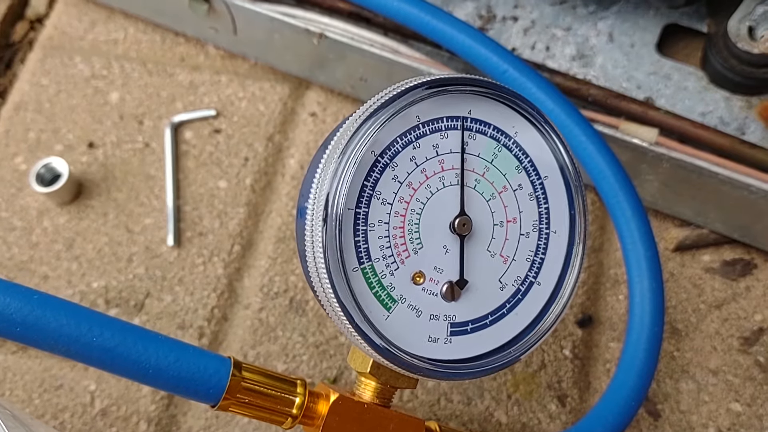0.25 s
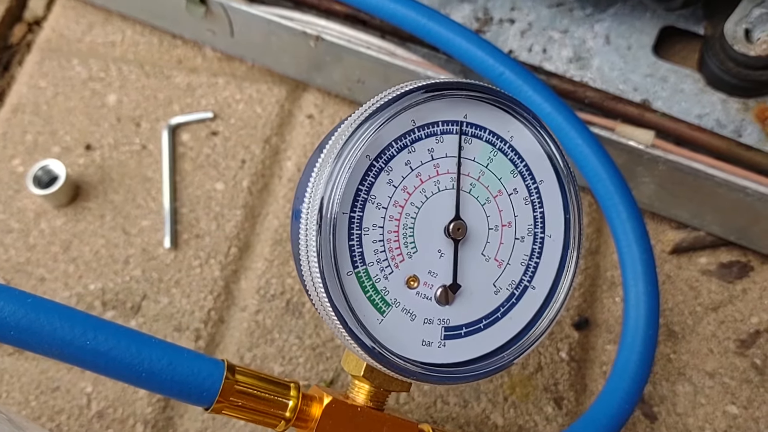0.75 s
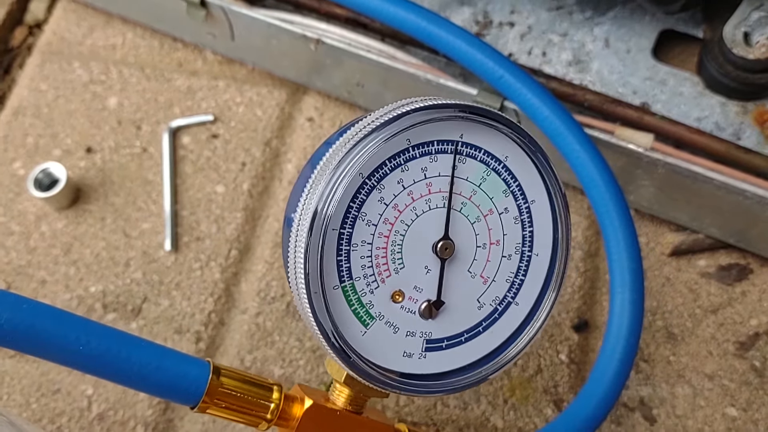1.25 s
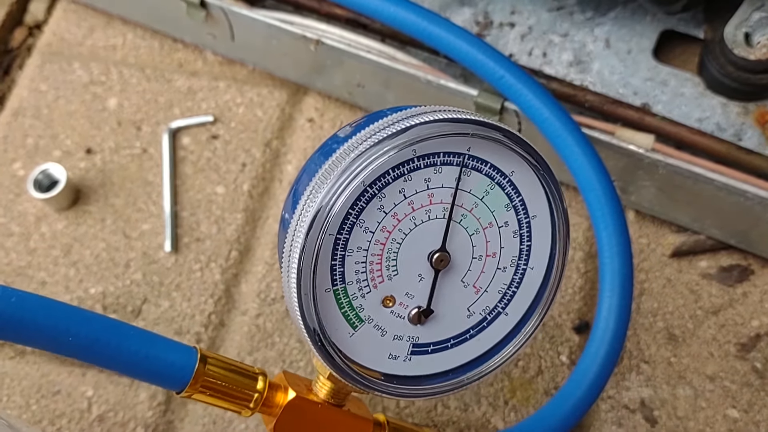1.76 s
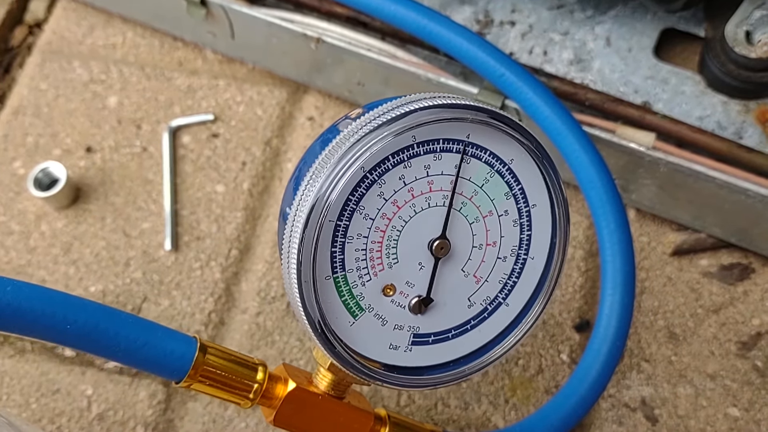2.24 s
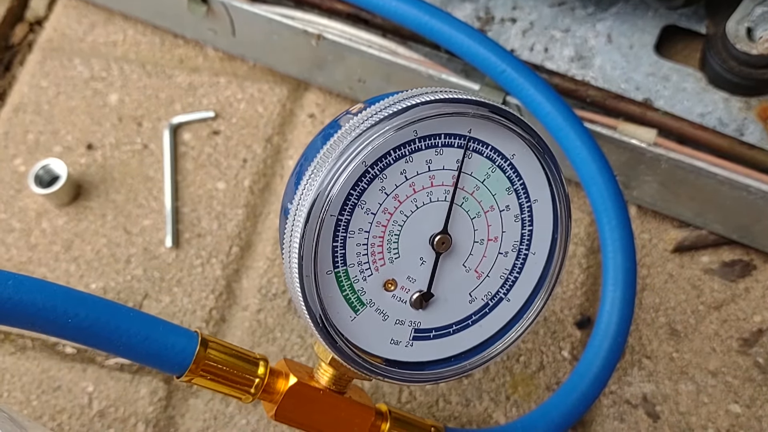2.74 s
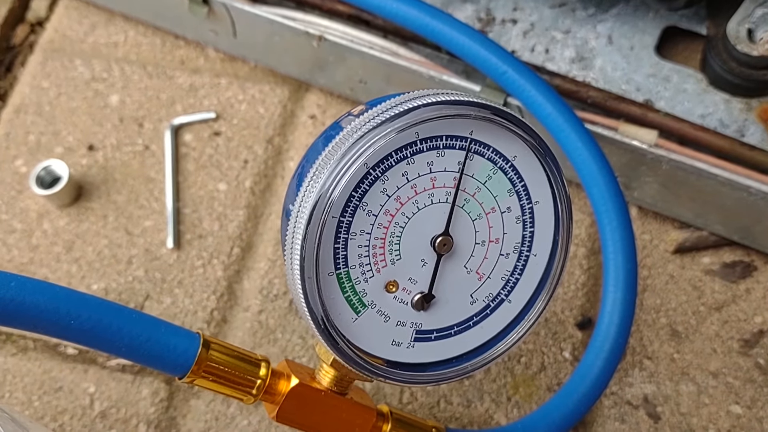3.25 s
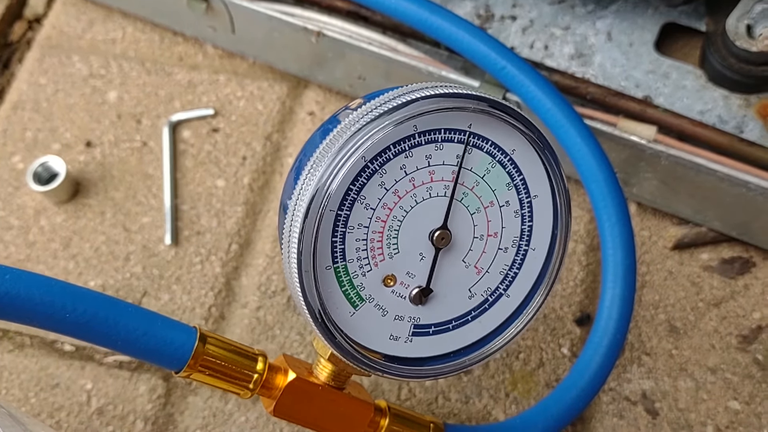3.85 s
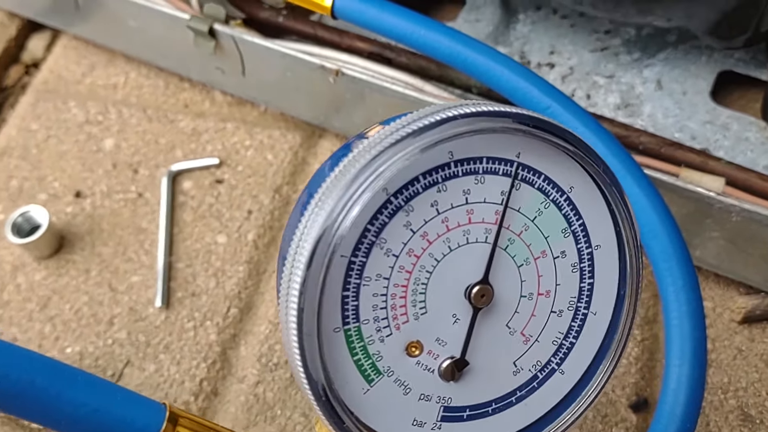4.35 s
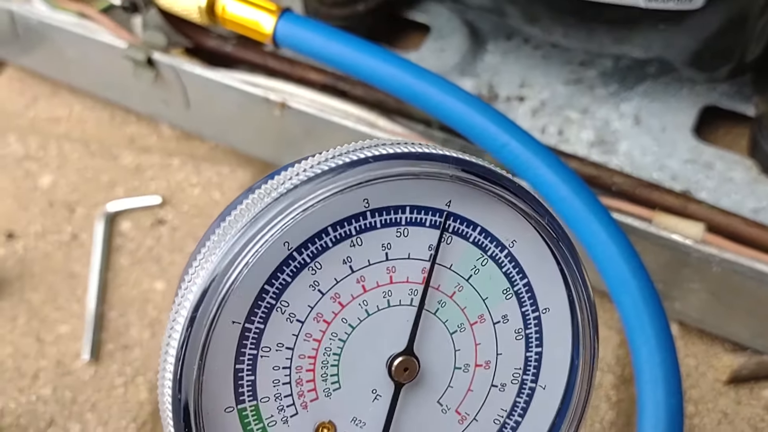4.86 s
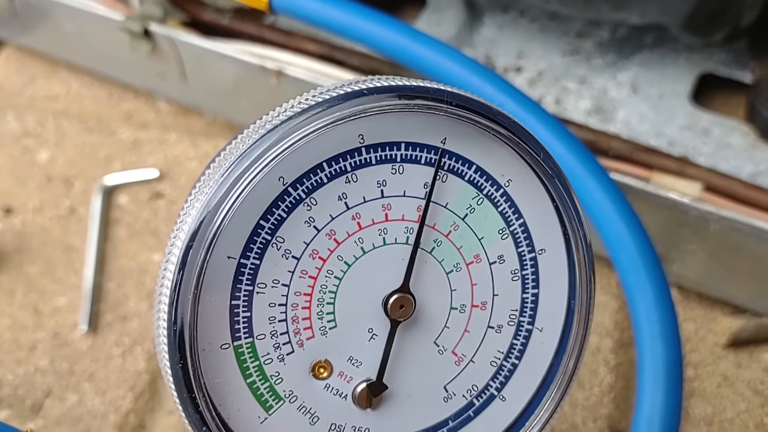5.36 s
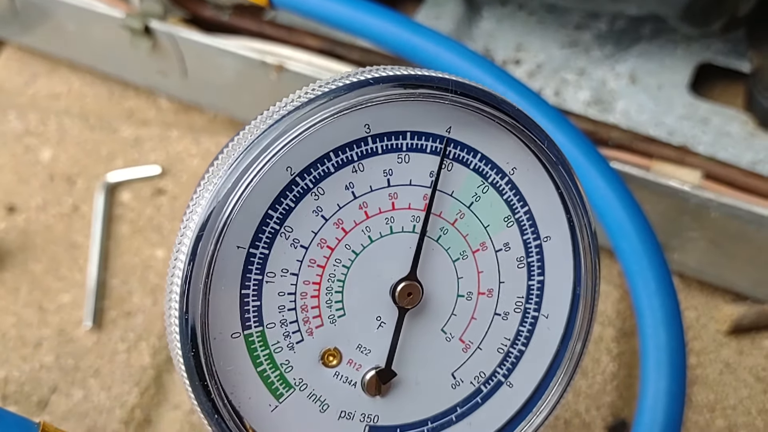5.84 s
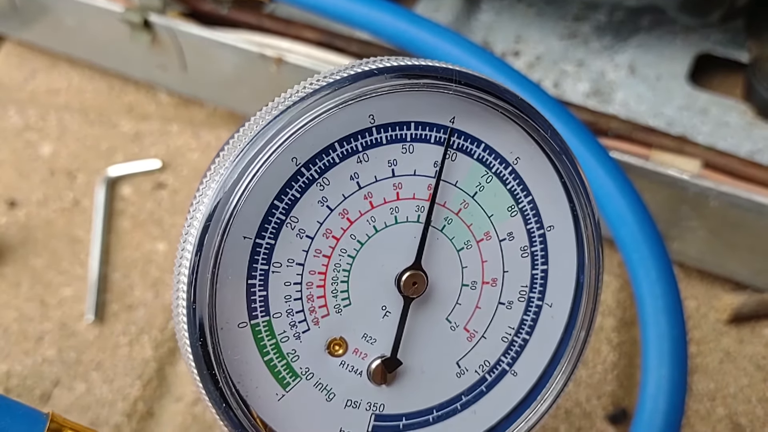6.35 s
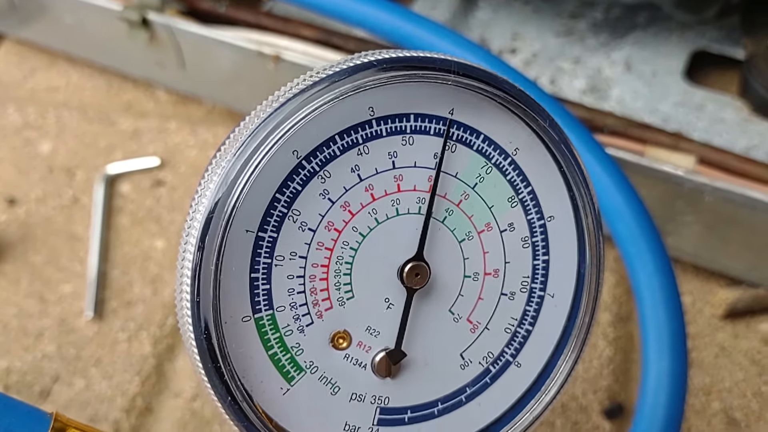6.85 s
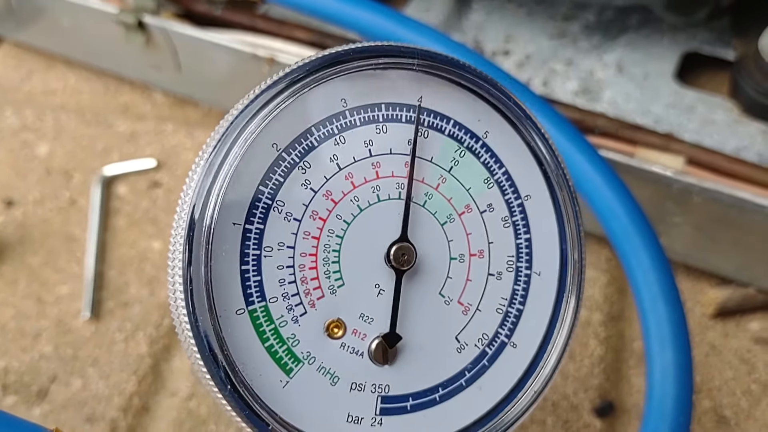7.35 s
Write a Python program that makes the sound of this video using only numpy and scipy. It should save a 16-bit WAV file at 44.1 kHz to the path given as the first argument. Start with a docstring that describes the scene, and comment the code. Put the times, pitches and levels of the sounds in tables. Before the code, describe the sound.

Outdoors, a compressor and fan drone steadily beneath a bright, sizzling refrigerant hiss. At first the hiss is fuller, with faint breathy whistles that fade as the valve settles just after one second. Sparse metallic ticks follow, clustering near four to five seconds as the handheld stereo microphone moves closer and the hiss changes colour. A sharp click and knock come near the end.

```python
"""Outdoors, a refrigerator compressor and a fan hum while refrigerant hisses through a valve and copper tubing.
The machine is sums of sine tones, and the air rumble and shaking panels are coloured noise.
The hiss is noise shaped into a broad jet and many narrow tubing resonances, with two whistles at the start.
The hand-held stereo microphone moves nearer to the gauge half way through, which recolours the hiss.
Fittings tick now and then, with short falling snaps and dull knocks of the gauge body."""
import sys
import numpy as np
from scipy import signal
from scipy.fft import rfft, irfft, next_fast_len
from scipy.io import wavfile
from scipy.ndimage import uniform_filter1d

SR = 44100
rng = np.random.default_rng(int(sys.argv[2]) if len(sys.argv) > 2 else 0)


def boost_factor(decibels):
    """Convert a level in decibels to a linear amplitude factor."""
    exponent = np.asarray(decibels, float) / 20
    return 10 ** exponent


def to_wav(s):
    """Save 16-bit WAV."""
    ch = np.atleast_2d(s).T  # columns
    pcm = np.round(np.clip(ch, -1, 1) * 32767)  # PCM
    wavfile.write(sys.argv[1], SR, pcm.astype(np.int16))


N = 335160  # samples, 7.6 s
T = np.arange(N) / SR
SIZE = next_fast_len(N)
HZ = np.arange(SIZE // 2 + 1) * SR / SIZE  # frequency of every noise bin
SETTLE_S = 1.08  # the valve settles here


def sides(pan_db):
    """Left and right gains that differ by pan_db."""
    return boost_factor(np.array([pan_db, -pan_db]) / 2)


def over_time(table):
    """Reads a (time, value) table at every sample, with straight lines between its points."""
    return np.interp(T, *np.transpose(table))


def on_log(table):
    """Reads a (frequency, value) table at every bin, straight on a logarithmic frequency scale."""
    hz, value = np.transpose(table)
    return np.interp(np.log(HZ + 1), np.log(hz), value)


def bumps(table):
    """Adds up smooth humps, each with its own rise and fall."""
    return sum(db * np.exp(-((T - s) / np.where(T < s, rise, fall)) ** 2) for s, db, rise, fall in table)


def noise(gain, alike, lead=0.):
    """Stereo noise of rms 1 coloured by gain; alike (0-1) is the share of power common to both sides."""
    common, left, right = rng.standard_normal((3, len(HZ))) + 1j * rng.standard_normal((3, len(HZ)))
    alike = np.clip(alike, 0, 1)
    left_lead = np.exp(1j * lead * np.array([[1], [0]]))
    pair = np.sqrt(alike) * common * left_lead + np.sqrt(1 - alike) * np.array([left, right])
    x = irfft(pair * gain, SIZE)[:, :N]
    return x / np.sqrt(np.mean(x ** 2))


def resonance(hz, width):
    """Gain of a resonance passed twice; width is taken 3 dB down."""
    return 1 / (1 + (np.sqrt(2) - 1) * (2 * (HZ - hz) / width) ** 2)


def walk(rate):
    """A random wandering curve: new levels rate times a second, smoothed twice; spread near 1."""
    k = int(SR / rate)
    held = np.repeat(rng.standard_normal(N // k + 1), k)
    return 0.72 * uniform_filter1d(uniform_filter1d(held, k), k)[:N]


def tones(phase, table, waver_db):
    """Sine tones at multiples of a turning phase, each wavering in level on its own."""
    out = np.zeros((2, N))
    for k, left_db, right_db, lead in table:
        turn = k * phase + rng.uniform(0, 2 * np.pi)
        swell = np.sqrt(2) * boost_factor(waver_db * walk(2.505))
        out += swell * np.array([boost_factor(left_db) * np.sin(turn + lead), boost_factor(right_db) * np.sin(turn)])
    return out


def add(out, s, sound, db, pan_db):
    """Scales a short sound to its peak level and places it; the further side hears it a little later."""
    for channel, gain in enumerate(boost_factor(db) * sides(pan_db)):
        late = int(max(0, 1.5 * pan_db * (2 * channel - 1)))  # samples
        start = int(s * SR) + late
        piece = sound[:N - start]
        out[channel, start:start + len(piece)] += gain * piece / np.max(np.abs(sound))


# the microphone's path: [t/s, place (0 far, 1 passing, 2 near)]
PATH = [(0, 0), (3.2, .05), (4.2, .4), (4.6, 1.0), (5.2, 1.1), (6.0, 2), (7.6, 2)]


def microphone_place():
    """Where the microphone is at every moment, from far (0) to near (2)."""
    return over_time(PATH)


# moments when the panels and the rumble swell: [t/s, level/dB, rise/s, fall/s]
SWELLS = [(1.9, 4, 0.38, 0.055), (4.0, 5.5, 0.28, 0.082), (4.7, 10, 0.1, 0.15), (5.78, 5.5, 0.82, 0.59),
          (1.25, 2, 0.17, 0.13)]


def swells():
    """Level in dB of the low booming, with its passing swells."""
    return -1 + bumps(SWELLS)


# air and yard rumble: [f/Hz, relative level per Hz/dB]
AIR = [(18, -40), (30, -18), (92, 1), (270, -11.5), (382, -14), (472, -14), (583, -18.5), (944, -22),
       (1140, -26.5), (1290, -27.5), (1890, -36), (2340, -63), (3000, -31.5), (3900, -25), (6600, -120)]
# how alike left and right are, for the rumble and the panels: [f/Hz, likeness 0-1]
AIR_ALIKE = [(60, .99), (140, .93), (290, .85), (640, .4), (1400, .3)]
# balance of the rumble: [f/Hz, left minus right level/dB]
AIR_BALANCE = [(100, -1), (200, -3), (420, -2), (700, -1.5), (1500, -14.5), (2500, 4.5)]


def air_rumble(boom_db):
    """Moving air as broad noise, strongest in the bass, whose level wanders slowly and quickly."""
    air = noise(boost_factor(on_log(AIR)) * sides(on_log(AIR_BALANCE)), on_log(AIR_ALIKE))
    return boost_factor(-60 + 0.082 * boom_db + 1.4 * walk(3.18) + 2.2 * walk(12.0)) * air


# panels shaken by the air stream: [f/Hz, width/Hz, level/dB, left minus right level/dB]
PANELS = [(86, 9.4, -62.5, -1), (82.6, 8.6, -71.5, 0.5), (103.6, 25, -64.5, -3.5),
          (133.4, 13.5, -73.5, 1.5), (168, 42, -75.5, 13), (266, 22.3, -66, -1), (334.6, 24, -73, -5),
          (460, 32, -75.5, -8)]


def panels(boom_db):
    """Panels drum in the air stream: each is noise passed through one low resonance."""
    out = np.zeros((2, N))
    for hz, width, db, pan_db in PANELS:
        drumming = noise(resonance(hz, width), on_log(AIR_ALIKE))
        out += boost_factor(db + boom_db) * sides(pan_db)[:, None] * drumming
    return out


# other tones of fixed pitch: [f/Hz, left level/dB, right level/dB, left leads/rad]
TONES = [(45.5, -76, -76, 0), (137, -72, -73, 0), (149.5, -74, -78, 0), (199.45, -78, -68.5, -.4),
         (398.9, -82, -79, .7), (480.0, -86, -75, -3.0), (594.8, -89, -89, 1.2)]


def fixed_tones():
    """Low hums at fixed pitches that waver in level."""
    return tones(2 * np.pi * T, TONES, waver_db=7.5)


# five-blade fan: [multiple of fan rate, left level/dB, right level/dB, left leads/rad]
FAN = [(3, -79, -79, 0), (5, -61.5, -60.5, -.1), (7, -63, -63, 0), (9, -69, -69, -.3), (11, -81, -81, -.3),
       (13, -75, -76, .3), (15, -73.5, -74.5, -.5)]


def fan():
    """A fan hums at multiples of its turning rate, 14.21 Hz."""
    return tones(2 * np.pi * 14.21 * T, FAN, waver_db=4.0)


# compressor shaft, slowing as the pressure builds: [t/s, f/Hz]
SHAFT = [(0, 59.503), (3.8, 59.478), (7.6, 59.46)]


def shaft_phase():
    """Angle of the compressor shaft, summed up from its turning rate."""
    return 2 * np.pi * np.cumsum(over_time(SHAFT)) / SR


CYCLE = 8192  # points in one shaft turn


def turning(phase, table, starts):
    """One shaft turn built from its multiples, read round and round."""
    lines = np.zeros((2, CYCLE // 2 + 1), complex)
    for k, left_db, right_db, lead in table:
        lines[:, k] = np.exp(1j * starts[k]) * np.array([boost_factor(left_db) * np.exp(1j * lead), boost_factor(right_db)])
    turn = irfft(lines, CYCLE) * CYCLE / np.sqrt(2)
    angles = np.arange(CYCLE) * 2 * np.pi / CYCLE
    return np.array([np.interp(phase, angles, side, period=2 * np.pi) for side in turn])


# shell tones, all with columns [multiple of shaft rate, left level/dB, right level/dB, left leads/rad]
# those whose level and balance do not follow the microphone
SHELL_THROUGHOUT = [(1, -65, -66, -.1), (2, -75, -75, -.1), (3, -82, -82, -.6), (4, -76, -86, -.5),
                    (5, -77, -75, -.7), (6, -79, -75, -.4), (15, -94, -90, -2.3), (22, -90, -92, -1.7),
                    (29, -97, -88, -2.8), (30, -93, -93, 0)]
# as they reach the far place
SHELL_FAR = [(7, -80, -80, -0.5), (8, -77, -60, -3.0), (9, -78, -81, 0.1), (10, -89, -89, 1.3),
             (11, -81, -93, 1.1), (12, -95, -90, -1.2), (14, -85, -84, 1.3), (16, -92, -91, 2.6),
             (17, -89, -82, -2.0), (18, -96, -83, 0.3), (19, -76, -71, -0.4), (20, -81, -74.5, 1.8),
             (21, -89, -88, 0.3), (23, -93, -88, 1.5), (24, -76, -72, -3.0), (25, -73, -83, 3.0),
             (32, -92, -92, -0.3), (33, -87, -87, 0.3), (40, -99, -90, 2.0), (53, -88, -87, 0.9),
             (54, -104, -95, -1.5), (55, -98, -94, -1.5), (57, -93, -96, -2.9), (61, -99, -85, 2.6),
             (62, -95, -88, 3.1), (63, -89, -87, 0.0), (64, -88, -83, 1.8), (72, -98, -107, -3.0),
             (83, -88, -86, -0.5), (84, -84, -90, -0.2), (100, -81, -92, 0.3), (101, -84, -84, -2.1),
             (103, -91, -87, 1.1), (107, -99, -87, -2.8)]
# as they reach the near place
SHELL_NEAR = [(7, -82, -82, -0.6), (8, -72, -58, -3.1), (9, -74, -75, -0.0), (10, -86, -88, 1.1),
              (11, -82, -89, 1.4), (12, -88, -96, -0.7), (13, -90, -91, 0.0), (14, -81, -86, 0.8),
              (17, -89, -78, -2.4), (18, -94, -82, -0.0), (19, -76, -71, -0.6), (20, -79, -75, 2.3),
              (21, -88, -78, -1.1), (23, -88, -86, -2.4), (24, -76, -74, -2.9), (25, -74, -74, -3.1),
              (31, -86, -89, 0.5), (32, -89, -90, 0.2), (33, -97, -93, -0.2), (44, -104, -94, 0.4),
              (51, -82, -97, 2.2), (55, -93, -94, 2.8), (56, -90, -88, 2.7), (57, -86, -79, -2.6),
              (58, -82, -82, -2.2), (59, -82, -85, -2.6), (61, -82, -81, -1.5), (62, -81, -80, -1.1),
              (63, -87, -83, 2.8), (64, -94, -92, -0.6), (70, -97, -108, -2.9), (72, -96, -99, -0.0),
              (73, -81, -81, -0.0), (74, -82, -82, -0.1), (77, -103, -95, -1.8), (83, -82, -85, -0.0),
              (85, -88, -89, -3.0), (100, -86, -86, -0.1), (101, -88, -85, -2.2), (104, -95, -95, -3.1),
              (114, -79, -82, -1.2), (129, -94, -82, 2.0)]


def compressor_shell(phase, place):
    """The shell hums at multiples of the shaft rate; many are balanced anew as the microphone moves."""
    starts = rng.uniform(0, 2 * np.pi, CYCLE // 2)  # shared, so both places stay in step
    near = np.clip(place - .3, 0, 1)
    shell = turning(phase, SHELL_THROUGHOUT, starts)
    shell += (1 - near) * turning(phase, SHELL_FAR, starts)
    shell += near * turning(phase, SHELL_NEAR, starts)
    return boost_factor(.4 + .8 * walk(2.4)) * shell


# two high shell tones that make a thin whine:
# [multiple of shaft rate, left level/dB, right level/dB, left leads/rad]
WHINE_ORDERS = [(92, -70.5, -75, -1.0), (93, -80, -84, .7)]


def compressor_whine(phase, place):
    """A thin whine grows with the pressure at first, and is shaded once the gauge comes between."""
    shade_s, shade_time_s = 4.48, .06
    shade_db = -11 * np.clip((T - shade_s) / shade_time_s, 0, 1)
    shade_db += -1.5 * np.maximum(T - shade_s, 0)  # dB per s
    growth_db = -14 * np.maximum(2.1 - T, 0)  # 14 dB per s until 2.1 s
    whine = boost_factor(3.5 + shade_db + growth_db) * tones(phase, WHINE_ORDERS, waver_db=1.1)
    left_db = 7 * np.clip(place, 0, .5)  # the left side gains as the microphone sets off
    return whine * boost_factor(left_db * np.array([[1], [0]]))


# blows answered by the gauge body: [t/s, peak level/dB, centre f/Hz, left minus right level/dB]
KNOCKS = [(1.262, -53.5, 800, 8), (2.108, -48.5, 520, -2), (4.5965, -46, 1000, 7), (7.498, -41.5, 975, 3),
          (7.543, -48, 980, 4)]
# what the gauge body rings with: [f/Hz, level/dB, time to fall 60 dB/s]
BODY = [(430, 0, .035), (660, -5, .03), (945, 0, .045), (1150, -3, .025)]


def knocks():
    """The gauge body answers heavier ticks with low, dying modes that bloom just after the blow."""
    bloom_s = .0025
    out, t = np.zeros((2, N)), T[:SR // 12]
    hz, db, t60 = (c[:, None] for c in np.transpose(BODY))
    for s, peak_db, centre_hz, pan_db in KNOCKS:
        reach_db = -12 * np.log2(hz / centre_hz) ** 2
        wave = np.sin(2 * np.pi * hz * t + rng.uniform(0, 1, hz.shape))
        ring = boost_factor(db + reach_db - 60 * t / t60) * wave
        add(out, s, ring.sum(axis=0) * (1 - np.exp(-(t / bloom_s) ** 2)), peak_db, pan_db)
    return out


# snaps that sweep down the hose: [t/s, peak level/dB, length/s, left minus right level/dB]
SNAPS = [(.2209, -43, .002, -8), (3.9401, -37, .0025, -16), (3.9808, -44, .002, -14),
         (3.9891, -35, .0022, -13), (7.4988, -38, .002, 6)]


def snaps():
    """Tiny snaps, each a slightly rough tone that falls very fast in pitch."""
    start_hz, octaves_per_s = 12000, 700
    out = np.zeros((2, N))
    for s, peak_db, length, pan_db in SNAPS:
        u = np.linspace(0, 1, int(length * SR))
        glide_hz = start_hz * 2 ** (-octaves_per_s * length * u)
        sweep = np.sin(2 * np.pi * np.cumsum(glide_hz) / SR)
        roughness = 1 + 0.15 * rng.standard_normal(len(u))
        add(out, s, sweep * np.sqrt(u) * (1 - u) * roughness, peak_db, pan_db)
    return out


# ticks of fittings: [t/s, peak level/dB, centre f/Hz, spread/octaves,
# ring against the click level/dB, left minus right level/dB]
TICKS = [(1.2603, -48.5, 1800, .6, 7, -1), (1.275, -49, 1910, .6, -3, 2),
         (1.82, -49.5, 2300, 0.65, -8, -2.5), (2.1074, -39.5, 2200, 1, 0, 4),
         (3.941, -48.5, 2400, 0.72, -6, -3), (3.980, -44, 2200, 0.91, 0, -9),
         (3.9892, -34.5, 2520, 0.88, 0, -4), (4.5962, -27.5, 1950, 0.57, -13, 7),
         (4.6140, -35, 1730, .25, -10, -4.5), (4.836, -41, 1940, 0.51, 1, -3.5),
         (4.957, -33.5, 2120, 0.49, -2, -4.5), (7.493, -48, 2000, .6, -3, 5),
         (7.4994, -26, 2110, 0.8, 4, 8.5), (7.542, -37.5, 2090, .7, 0, 8.5)]
# what the fittings ring with: [f/Hz, level/dB, share of the tick's ringing time]
FITTING = [(1443, 1, .7), (1685, 1, .7), (1850, 1, .5), (2229, 5, .9), (2447, 1, .6), (2980, -1, .7),
           (3420, -3, .7), (3680, -3, .5), (4350, -5, .5)]


def ticks():
    """A sharp click of contact, then the fitting's modes near the tick's centre and a short rattle."""
    crack_s = .0015
    out, t = np.zeros((2, N)), T[:SR // 8]
    bins = np.arange(len(t) // 2 + 1) * SR / len(t) + 1
    hz, db, share = (c[:, None] for c in np.transpose(FITTING))
    rise = SR // 1000  # 1 ms of room for the filter's lead-in
    for s, peak_db, centre_hz, spread, ring_db, pan_db in TICKS:
        t60 = 0.045 / spread ** 0.15  # s to fall 60 dB; narrower ticks ring longer
        click = np.exp(-t / crack_s) * np.cos(2 * np.pi * centre_hz * t)
        wave = np.cos(2 * np.pi * hz * t + rng.uniform(-0.52, 1, hz.shape))
        ring = boost_factor(db - 60 * t / (t60 * share)) * wave
        rattle = rng.standard_normal(len(t)) * (1 - np.exp(-t / 0.0015)) * boost_factor(-60 * t / t60)
        reach = boost_factor(-5.5 * (np.log2(bins / centre_hz) / spread) ** 2)  # fades away from the centre
        parts = irfft(rfft([click, ring.sum(axis=0), rattle]) * reach, len(t))
        parts = np.roll(parts, rise, axis=1)[:, :SR // 12]
        click, body, rattle = parts / np.max(np.abs(parts), axis=1)[:, None]
        add(out, s, click + boost_factor(ring_db) * body + boost_factor(-8) * rattle, peak_db, pan_db)
    return out


def whistles():
    """Breathy whistles at the valve seat: narrow bands of noise that die away as the valve settles."""
    before, after = np.maximum(SETTLE_S - T, 0), np.maximum(T - SETTLE_S, 0)
    low_db = -67 - 450 * after ** 2 + 1.5 * before + 4.5 * walk(14.0)
    high_db = -53 - 21 * before - 100 * after  # climbs 21 dB per s, then fades
    low = boost_factor(low_db) * sides(5.4)[:, None] * noise(resonance(2122, 44), 1.0)
    # the low whistle's pitch wavers by about 10 Hz, and sags 550 Hz per s at the end
    glide_hz = 10 * walk(7.0) - 550 * after
    shift = np.exp(2j * np.pi * np.cumsum(glide_hz) / SR)
    low = np.real(signal.hilbert(low, SIZE)[:, :N] * shift)
    high = boost_factor(high_db) * sides(-6.0)[:, None] * noise(resonance(7840, 210), 0.97, -1.2)
    return low + high


LEFT_EARLY_S = 18 / SR  # the shared part of the hiss reaches the left side this much earlier

# the jet between the tubing modes: [f/Hz, relative level per Hz/dB]
JET = [(1200, -31.5), (1800, -24.5), (2800, -28.5), (3400, -42), (3750, -27), (4200, -31), (4700, -42),
       (5250, -18.5), (5700, -19.5), (6350, -31), (7120, -17.5), (8600, 2), (10500, 2), (11600, 4),
       (12250, 9.5), (13400, 3), (14200, 5), (14600, 8), (14850, 12.5), (15800, 11)]


def jet(place, liquid_db, rush_db):
    """Turbulent gas as broad noise in three bands; piston strokes pulse the lowest one."""
    jet_db, stroke_depth = -47, .45
    shape, lead = boost_factor(on_log(JET)), 2 * np.pi * HZ * LEFT_EARLY_S
    low = 1 / (1 + (HZ / 7000) ** 4)
    wet = 1 / (1 + (HZ / 3100) ** 6)  # the lowest part, most lifted by liquid
    strokes = 1 + stroke_depth * np.cos(shaft_phase())
    place_db = np.interp(place, np.arange(3), [0.6, 3.0, -0.6])
    out = boost_factor(jet_db + place_db) * noise(shape * (1 - low), 0.26, lead)
    out += boost_factor(jet_db - 20.0 + rush_db + 1.72 * liquid_db) * noise(shape * low * (1 - wet), 0.047, lead)
    out += boost_factor(jet_db - 32.5 + 2.47 * liquid_db) * strokes * noise(shape * wet, 0.055, lead)
    return out


# tubing modes in the hiss: [f/Hz]
TUBE_HZ = [2850, 5300, 6600, 2510, 3800, 4540, 4850, 6270, 6470, 7590, 3050, 3690, 4350, 4940, 5100, 5480,
           5950, 6790, 7330, 7700, 8260, 9080, 9520, 10100, 10800, 11200, 11900, 12470, 12870, 13210, 13630,
           13900, 14430, 14960, 15490, 15700, 12300, 12750, 13510, 14200]
# and for each of them: [width/Hz, far level/dB, passing level/dB, near level/dB,
# left minus right level/dB, left leads/rad]
TUBES = [(99, -88.5, -79, -92, 4, 1.5), (147, -77.5, -95, -88, -2, -1.5), (130, -83, -90, -91, -7, 1.5),
         (89, -85.5, -83, -84.5, 4, 1.5), (94, -84.5, -84.5, -92, -6, 2), (77, -80, -81.5, -83, 0, 1.5),
         (77, -76.5, -80.5, -88, 1.5, 1.5), (71, -80.5, -89, -92, 2, -2), (60.3, -77, -92, -96, -10, 10),
         (150, -81.5, -72, -71.5, -2, 2), (108, -78, -81.5, -80, -1.5, 1.9), (113, -82, -78, -76, -1, 2),
         (66, -86.5, -79.5, -79.5, 3, 0.26), (89, -91, -77, -77.5, 6, 3),
         (154, -77.5, -100, -75.5, -3, 2.5), (57, -77, -84, -97, -1.5, -1),
         (100, -75.5, -74, -76, 1.5, -2.1), (113, -72.5, -75, -75.5, -6, 1),
         (92.5, -67.5, -71.5, -70.5, 0, -2), (172, -63, -66.5, -72.5, -8, -2.5),
         (192, -68, -62, -70.5, 0.5, 0), (102, -71, -70, -79, 8, 3.5), (152, -67, -61.5, -66, 4.5, -1.5),
         (97, -67.5, -66, -66, 3, 4.5), (157, -71, -67.5, -62.5, 0, 2), (113, -65, -65, -73, 6.5, 4),
         (71.4, -68, -59, -58.5, 3.5, -3), (100, -51.5, -47.5, -67, 1, -2), (101, -57.5, -51, -70, -6, 0),
         (90, -57.5, -56, -68, 9.5, 3.5), (97, -57, -49.5, -54, -4, -4.5), (130, -58, -56, -57.5, 6, -5),
         (90, -67, -52, -62, 3, 0), (128, -55, -60, -69, 2, 1), (95, -55, -56, -55.5, 1, 1.5),
         (110, -52.5, -53, -66, 0, 0.5), (149, -56, -57.5, -63, -3, 0), (110, -62.5, -59, -61, -3, 0.5),
         (99, -76, -63, -61, -4, 0.5), (110, -63, -57, -72, -2, 2)]


def tubing(place, liquid_db, rush_db):
    """The gas excites the copper tubing: narrow noise bands whose levels follow the microphone."""
    out = np.zeros((2, N))
    for hz, (width, *db, mode_pan_db, lead) in zip(TUBE_HZ, TUBES):
        heard_db = np.interp(place, np.arange(3), db) + 0.87 * walk(17.0)
        heard_db += 0.9 * liquid_db * np.clip(np.log(12000 / hz), 0, 1)  # lower modes gain more
        heard_db += rush_db * np.exp(-(np.log2(hz / 5430) / 0.26) ** 2)  # the rush centres on 5430 Hz
        lead_here = lead + 2 * np.pi * (HZ - hz) * LEFT_EARLY_S
        mode = noise(resonance(hz, width), .68, lead_here)
        out += boost_factor(heard_db) * sides(mode_pan_db)[:, None] * mode
    return out


# gas flow through the valve: [t/s, hiss level/dB]
GAS = [(0, 2.5), (.8, 3.5), (2.2, 3.5), (3.5, 1.3), (4.2, 1.6), (4.9, 3), (5.6, 3), (6.5, 3), (7.6, 3)]
# slugs of liquid lift the lower hiss: [t/s, level/dB, rise/s, fall/s]
SLUGS = [(0, 1.5, 0.051, 1.0), (4.05, 4.5, 0.12, 1), (7.6, 4, 0.27, .3)]
# balance of the hiss when far, passing, near: [left minus right level/dB]
HISS_PAN_DB = [1.5, -1, 0.5]


def hiss(place):
    """Gas through valve and tubing: jet and modes surge together, and slugs of liquid lift the lower part."""
    liquid_db = 2 - 0.01 * place + bumps(SLUGS)
    # a broad rush in the middle of the jet until the valve settles, then a 0.57 s fade
    rush_db = 8.5 * np.exp(-(np.maximum(T - SETTLE_S, 0) / 0.57) ** 2)
    surge_db = 0.2 * walk(13.0) + 0.98 * walk(28.0)
    pan_db = np.interp(place, np.arange(3), HISS_PAN_DB)
    out = jet(place, liquid_db, rush_db) + tubing(place, liquid_db, rush_db)
    return out * boost_factor(over_time(GAS) + surge_db) * sides(pan_db)


def scene():
    """Rumble, machine, ticks and gas together."""
    place, boom_db, phase = microphone_place(), swells(), shaft_phase()
    background = air_rumble(boom_db) + panels(boom_db) + fixed_tones() + fan()
    compressor = compressor_shell(phase, place) + compressor_whine(phase, place)
    fittings = knocks() + snaps() + ticks()
    return background + compressor + fittings + whistles() + hiss(place)


def band_limit(x):
    """A steep low-pass at the top of the band."""
    return signal.sosfilt(signal.butter(12, 16900, fs=SR, output="sos"), x)


def record(dry):
    """The microphone drops the deepest bass and the recorder cuts the top steeply."""
    low_hz, top_hz = 52, 15740
    bass_cut = signal.butter(3, low_hz, "high", fs=SR, output="sos")
    top_cut = signal.ellip(12, .3, 70, top_hz, fs=SR, output="sos")
    mix = signal.sosfilt(top_cut, signal.sosfilt(bass_cut, dry))
    return band_limit(mix)


dry = scene()
out = record(dry)
to_wav(out)
```